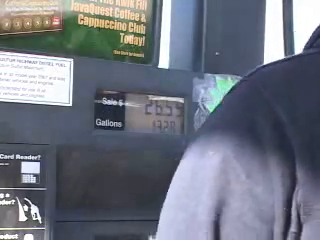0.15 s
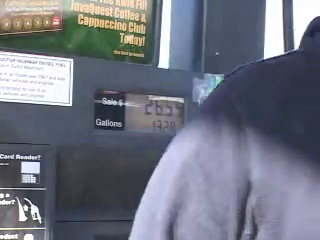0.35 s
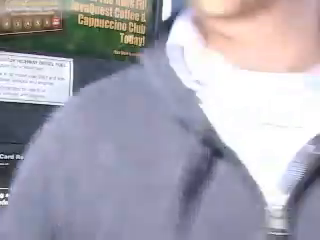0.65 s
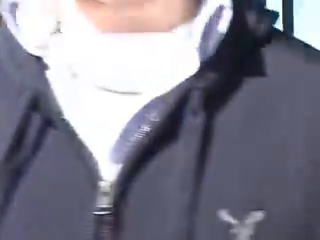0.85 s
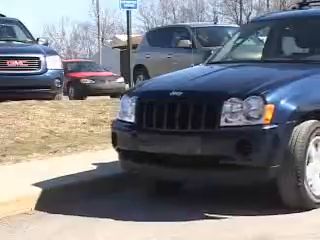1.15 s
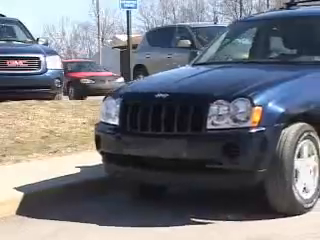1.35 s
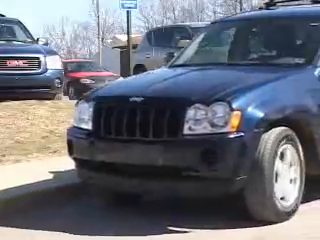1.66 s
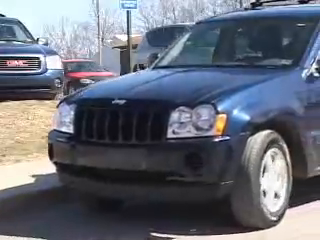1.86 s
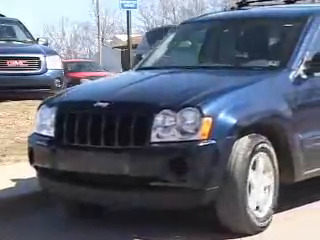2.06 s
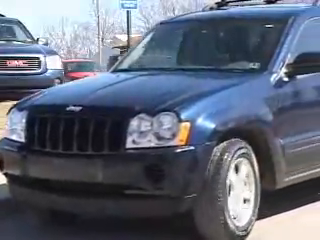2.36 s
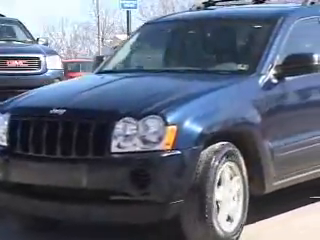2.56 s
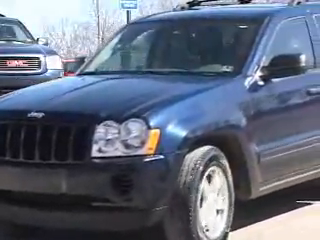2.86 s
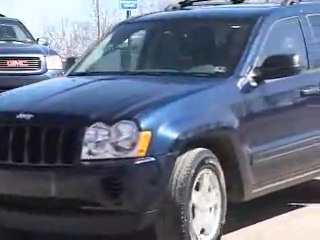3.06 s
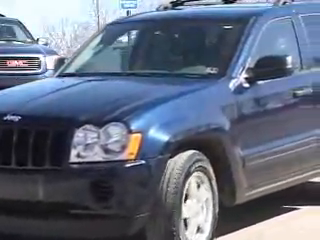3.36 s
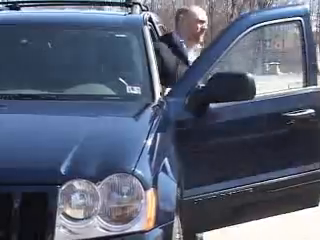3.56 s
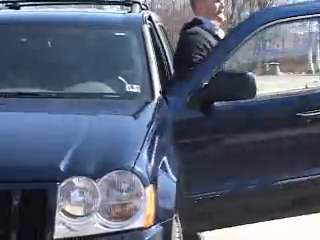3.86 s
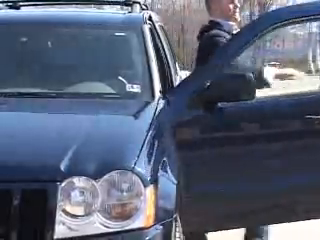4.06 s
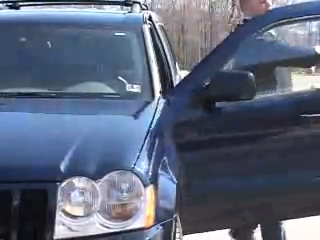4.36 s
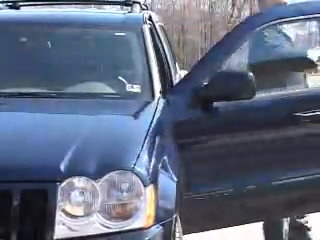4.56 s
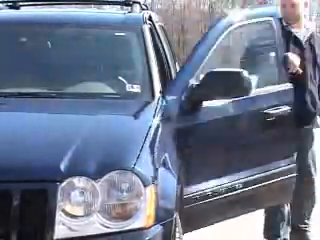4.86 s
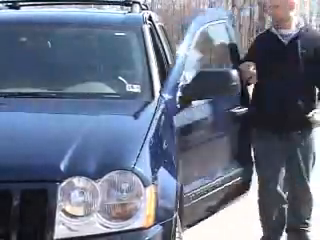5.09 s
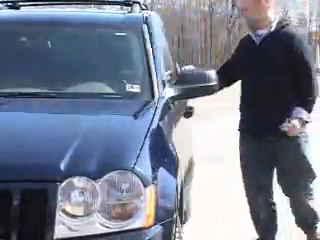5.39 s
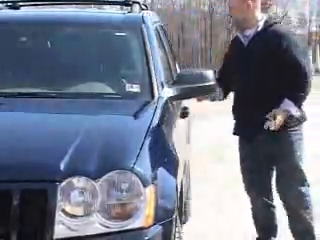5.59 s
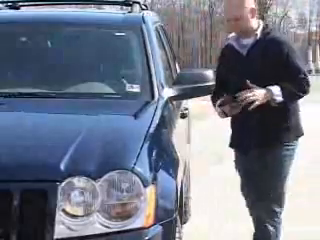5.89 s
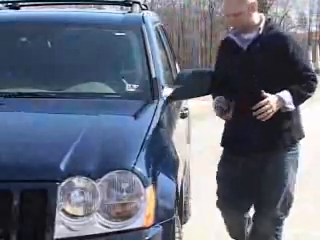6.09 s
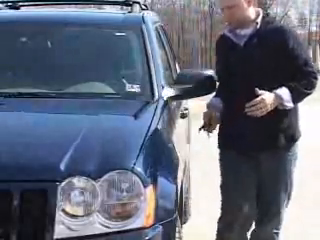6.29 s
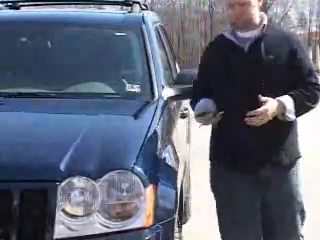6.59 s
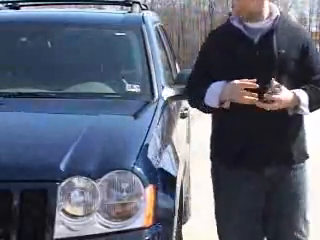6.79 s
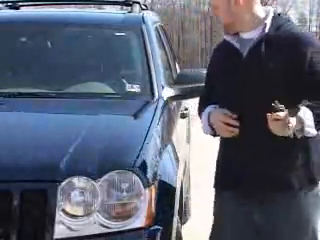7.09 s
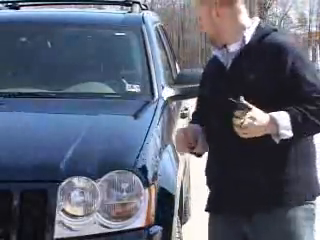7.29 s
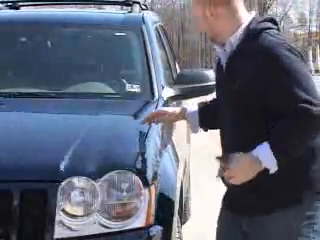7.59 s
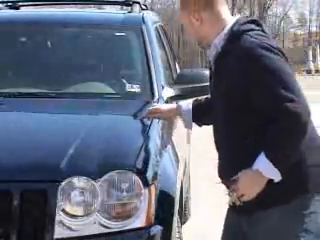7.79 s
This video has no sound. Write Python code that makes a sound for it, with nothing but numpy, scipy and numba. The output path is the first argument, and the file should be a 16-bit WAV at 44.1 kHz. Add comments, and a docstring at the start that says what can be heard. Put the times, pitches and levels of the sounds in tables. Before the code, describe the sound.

From 0 to 1.2 s a fuel pump drones with broad motor noise, the loudest background. At about 0.4 s the nozzle drops into its holster in a quick cluster of hollow knocks; a faint high spring squeak sags at 0.75 s, and the hose scrapes roughly at 1.0-1.2 s. A hard cut brings a quieter car, low engine murmur and tyres rolling slowly, with sparse grit ticks, notably at 1.6 s and dull taps near 2.3 s. At 3.6 s it cuts to still quieter open air. Soles scuff and grit snaps around 4.1-5.4 s; at 5.6 s the car door slams, a deep boomy thud with a brief latch rattle. Keys jingle brightly from 5.9 s, strongest at 6.05 and around 7 s, continuing to the end. Wind rumbles low on the microphone, mainly 5.8-7 s. Close footsteps crunch, with sharp loud grit cracks at 7.57 and 7.92 s.

```python
"""A fuel pump hums, then the nozzle thumps home, its spring squeaks and the hose scrapes. Hard cut: a car rolls
slowly up over gritty tarmac. Hard cut: its driver steps out, slams the door and walks off jangling keys while
wind rumbles on the microphone. Struck bodies are banks of decaying modes, grit and keys are random impulses
through resonances, and the pump, car, wind and open air are filtered noise."""
import sys
import numpy as np
from scipy import signal
from scipy.io import wavfile
from scipy.ndimage import uniform_filter1d
from numba import njit

SR = 44100
rng = np.random.default_rng(int(sys.argv[2]) if len(sys.argv) > 2 else 0)


def master_out(mix):
    """Clip the mix to full scale and print it as 16-bit PCM to the path in sys.argv[1]."""
    frames = np.transpose(np.atleast_2d(mix))
    ceiling = np.clip(frames, -1, 1)
    pcm = np.round(ceiling * 32767).astype(np.int16)
    wavfile.write(sys.argv[1], SR, pcm)


N = 350154
OPPOSED = np.array([[1], [-1]])  # left and right in opposite polarity


# Modes of the holster: mode_hz, relative_db, t60_s
NOZZLE_MODES = [(95.6, -15, 0.44), (137, -20, 0.55), (193, -1, 0.076), (252, 4.5, 0.045),
                (334, -3.5, 0.036), (389.7, -3, 0.15), (510, -3.5, 0.045), (840, -16, .06),
                (1050, -18, .06), (1320, -21, .04)]
# Knocks of the nozzle going home: start_s, blow_db
NOZZLE_BLOWS = [(.373, -33), (.383, -15), (.39, -16), (.397, -14), (.41, -24), (.438, -30.5), (.449, -27)]


def nozzle_thump():
    """The nozzle drops into its holster: a cluster of knocks rings the holster's modes."""
    return struck(NOZZLE_BLOWS, NOZZLE_MODES, contact_s=0.0018, shudder_db=-30.5, shudder_t60=0.17)


def spring_squeak():
    """A spring squeaks: a sagging sine with rough pitch and strength."""
    peak_s, rms_db, rise_s, t60_s = .762, -37, .04, .28
    peak_hz, sag_hz_per_s = 4980, 830
    t = np.arange(N) / SR
    hz = peak_hz - sag_hz_per_s * np.clip(t - peak_s, -.1, .1)
    wavering_hz = hz * (1 + 0.013 * walk(500))
    tone = np.sqrt(2) * np.sin(2 * np.pi * np.cumsum(wavering_hz) / SR)
    return burst(peak_s, rms_db, rise_s, t60_s) * undb(4.5 * walk(290)) * tone


# Pressure of the dragging hose: time_s, pressure_db
SCRAPE_PRESSURE = [(1.0, -56), (1.014, -30), (1.035, -28), (1.095, -38), (1.105, -46), (1.135, -38),
                   (1.215, -57)]
# Resonances the dragging hose excites: centre_hz, width_hz, relative_db
SCRAPE_RINGS = [(338, 99, -7), (523, 52, -0.5), (810, 83, -9), (834, 83, 4.5), (980, 150, 0.5),
                (1110, 190, -7), (4000, 230, -1.5), (5360, 3500, 7)]


def hose_scrape():
    """The hose drags in stick-slip: random slips excite resonances, deeper and duller as it goes."""
    gate, pressure_db = curve(SCRAPE_PRESSURE)
    since = np.clip(np.arange(N) / SR - SCRAPE_PRESSURE[0][0], 0, .17)
    deep_db = -10 + 96 * since  # dB/s, rings below 700 Hz
    bright_db = -9 - 134 * since  # dB/s, rings above 3 kHz
    slips = grains(900, 3.4)
    rings = 0
    for hz, width, db in SCRAPE_RINGS:
        ring_db = db + (hz < 700) * deep_db + (hz > 3000) * bright_db
        rings = rings + undb(ring_db) * unit(band(slips, hz, width))
    return gate * undb(pressure_db) * rings / 2


# Rattles of lock and trim: peak_s, level_db, rise_s, t60_s
LATCH_RATTLES = [(5.588, -24.5, 0.031, 0.081), (5.621, -35.5, 0.015, 0.26)]


def door_latch():
    """Lock and trim rattle: dense impulses through a broad mid band and a low band."""
    rattle = grains(3000, 2.0)
    metal = unit(svf(rattle, 2100.0, 2400.0))
    low = undb(7.5) * unit(band(rattle, 500, 970))
    return sum(burst(*row) for row in LATCH_RATTLES) * (metal + low)


# Modes of panel and cabin: mode_hz, relative_db, t60_s
DOOR_MODES = [(54.4, -5.5, 0.27), (79.2, -3, 0.27), (100, -3, 0.18), (134.5, -2, 0.078), (154, -3, 0.079),
              (205, -6.5, 0.11), (277, -8, .13), (338, -14, .12), (426, -11, .12), (710, -21, .1),
              (947, -22, .1), (1140, -21, .1)]
# Pushes of the panel on its frame: start_s, blow_db
DOOR_BLOWS = [(5.574, -27), (5.586, -18.5), (5.603, -21), (5.619, -13.5), (5.632, -27), (5.655, -26),
              (5.69, -25.5)]


def door_slam():
    """The panel meets its frame and the cabin booms in low modes; the deepest boom leans left."""
    boom = struck(DOOR_BLOWS, DOOR_MODES, contact_s=0.0048, shudder_db=-36.5, shudder_t60=0.29)
    return boom + 0.41 * band(boom, 45, 43) * OPPOSED


# Modes of the keys: mode_hz, relative_db
KEY_MODES = [(3690, -8), (4005, -9.5), (4640, -6), (5040, -1), (5430, -23), (5780, -6), (6630, 0),
             (7190, 5.5), (7480, 0.5), (7900, -17), (8200, 1.5), (8530, 7), (8800, -7), (9300, -2),
             (9770, -9), (10250, 1), (10570, -28), (11070, 9.5), (11230, -2), (11500, 1), (11900, -2.5)]
# Swings and jolts of the bunch: peak_s, effort_db, rise_s, t60_s
KEY_SHAKES = [(3.84, -69, 0.18, 0.79), (4.13, -61, 0.036, 0.23), (5.94, -46, 0.11, 0.47),
              (6.06, -30.5, 0.061, 0.22), (6.091, -34, 0.04, 0.12), (6.28, -60, 0.027, 0.32),
              (6.56, -62, 0.031, 0.12), (6.78, -59.5, 0.045, .15), (6.844, -43, 0.016, 1.1),
              (6.925, -36.5, 0.02, 0.97), (7.0, -37.5, 0.05, 1.03), (7.13, -43, 0.12, 0.18),
              (7.29, -41.5, 0.16, 1), (7.455, -40.5, .04, 0.17), (7.748, -34.5, 0.027, 0.55),
              (7.86, -46, 0.044, 0.18)]
# Hard strikes of key on key: strike_s, relative_db
KEY_CLINKS = [(5.8487, -33.5), (5.922, -28), (5.9329, -26), (6.0536, -13), (6.3118, -34.5), (6.355, -44),
              (6.387, -45.5), (6.562, -31.5), (6.702, -34.5), (6.9193, -23.5), (6.992, -18), (7.1302, -26),
              (7.433, -19.5), (7.4644, -18.5), (7.7448, -30), (7.7925, -27), (7.8346, -31)]


def keys():
    """Shaken keys touch at random; every touch rings another mix of modes, damped by the hand."""
    effort = sum(burst(*jolt) for jolt in KEY_SHAKES) * undb(3.8 * walk(90))
    t = np.arange(3000) / SR
    clink = np.minimum(t / 0.00066, 1) * undb(-60 * t / 0.029)
    for s, db in KEY_CLINKS:
        add(effort, s - .002, undb(db - 7.5) * clink)
    touches = effort * unit(grains(1300, 2.2))
    chatter = band(touches * rng.standard_normal(N), 7470, 11000)
    out = undb(-0.5) * chatter * np.ones((2, 1))
    for hz, db in KEY_MODES:
        for detune in 1, 1 + 0.0197 * rng.standard_normal():  # a similar key rings close by
            favoured = undb(9 * walk(40))
            push = touches * favoured * rng.standard_normal(N)
            out += pan(ring(push, hz * detune, db - 41.0, t60=.04), 0.84 * rng.standard_normal())
    return out


SCATTER_DB = 0.5  # random left-right difference of grains and crunches

# Rubs and crunches of soles, tyres and fittings: peak_s, body_db, brightness_db, t60_s
CRUNCHES = [(0.39, -31.5, -17, 0.18), (.446, -46, 8, 0.19), (.64, -45.5, 2, 0.18), (1.623, -42, -3, .084),
            (2.752, -57, 8.5, .12), (4.123, -57.5, -10, 0.33), (4.288, -58.5, -1, 0.61),
            (4.353, -51.5, 13, 0.057), (4.702, -44.5, 3.5, 0.15), (4.763, -51, 0, 0.33),
            (4.851, -44.5, -8.5, 0.21), (5.245, -48.5, -1.5, 0.25), (5.41, -65.5, 14.5, .5),
            (5.949, -57, 10.5, 0.45), (6.044, -46, 5.5, 0.32), (6.505, -48, -6, 0.31),
            (6.607, -52.5, -8, 0.24), (6.945, -52.5, 15, 0.56), (7.0, -38, -4, .4),
            (7.083, -46.5, -11.5, 0.12), (7.35, -35, -10.5, 0.11), (7.58, -23, -2.5, 0.099),
            (7.64, -49.5, 2, 0.53), (7.921, -25.5, -3, 0.3)]


def crunch():
    """Soles, tyres and fittings rub: dense grains in three bands, the low one weaker when brighter."""
    sand = grains(1800, 3.5)
    body = unit(band(sand, 2620, 1870))
    bright = unit(band(sand, 4380, 4100))
    low = unit(band(sand, 596, 1090))
    out = np.zeros((2, N))
    for s, db, bright_db, t60 in CRUNCHES:
        mix = body + undb(bright_db) * bright + undb(-7.5 - 0.92 * bright_db) * low
        out += pan(burst(s, db, 0.034, t60) * mix, SCATTER_DB * rng.standard_normal())
    return out


# Single snapping grains: start_s, peak_db, centre_hz
GRIT_SNAPS = [(.7093, -26.5, 4940), (1.3289, -35, 2310), (1.6214, -22, 3300), (2.1015, -39, 2310),
              (2.5156, -35.5, 2550), (2.765, -35.5, 2280), (3.081, -32, 3185), (4.117, -35.5, 2430),
              (4.139, -29.5, 1670), (4.2842, -37, 4970), (4.354, -17, 6140), (4.6924, -16.5, 4900),
              (4.6985, -18, 3750), (4.7, -18.5, 4100), (4.705, -17.5, 3000), (4.7603, -32, 1920),
              (4.7634, -21.5, 3550), (4.7802, -29.5, 2210), (4.8491, -20, 2130), (4.8567, -22, 2040),
              (4.8677, -32, 2700), (4.926, -43, 2200), (5.2404, -32, 4930), (5.2467, -33, 2920),
              (5.276, -26.5, 4570), (5.3597, -36, 4600), (5.4046, -28, 4080), (5.429, -35, 3950),
              (5.469, -35, 4700), (5.8788, -25.5, 4340), (5.8977, -37, 5820), (6.0044, -26, 4800),
              (6.4966, -27, 2950), (6.5055, -26.5, 5000), (6.517, -33, 2920), (6.6368, -32, 2850),
              (7.082, -19.5, 2540), (7.3486, -16.5, 2160), (7.5628, -21, 2030), (7.5742, -6.5, 2780),
              (7.5819, -9, 2420), (7.5934, -11, 2590), (7.6565, -22.5, 2880), (7.749, -25, 2940),
              (7.9117, -19, 2430), (7.9217, -10, 3740), (7.9344, -14, 3200)]


def grit():
    """Lone grains snap: a click and a noise flash with a short tail from the tarmac, through one band."""
    out, t = np.zeros((2, N)), np.arange(3000) / SR
    decay = np.exp(-t / 0.00017) + 0.12 * np.exp(-t / 0.0056)
    for s, db, hz in GRIT_SNAPS:
        click = (t == 0) * 1.5
        snap = band(click + rng.standard_normal(3000) * decay, hz, 1.07 * hz)
        add(out, s, pan(undb(db) * snap / abs(snap).max(), SCATTER_DB * rng.standard_normal()))
    return out


# Dull falls of heel and toe: start_s, peak_db, centre_hz
HEEL_FALLS = [(2.27, -30.5, 1360), (2.278, -43.5, 567), (4.149, -43.5, 566), (4.853, -33.5, 780),
              (6.51, -44, 595), (6.54, -41, 600), (6.571, -37, 540), (6.998, -29.5, 457), (7.028, -31, 720),
              (7.081, -29, 765), (7.348, -23.5, 726), (7.56, -26.5, 1590), (7.908, -33, 630)]


def footfalls():
    """Heel and toe fall dully: short decaying noise in a narrow band."""
    out, t = np.zeros(N), np.arange(3000) / SR
    envelope = undb(-60 * t / 0.056) * np.minimum(t / 0.0039, 1)
    for s, db, hz in HEEL_FALLS:
        thud = band(rng.standard_normal(3000) * envelope, hz, 0.5 * hz)
        add(out, s, undb(db) * thud / abs(thud).max())
    return out


def surroundings(near):
    """Car flank, pump and tarmac send back a short scatter, different at each side."""
    t = np.arange(4000) / SR
    tail = rng.standard_normal((2, 4000)) * undb(-60 * t / 0.071) * (t > .001)
    tail = signal.sosfilt(signal.butter(2, 400, "high", fs=SR, output="sos"), tail)
    return near + undb(-40.5) * signal.fftconvolve(near, tail, axes=1)[:, :N]


# Strength of the wind: time_s, strength_db
WIND_STRENGTH = [(3.59, -55.5), (3.9, -56), (3.95, -48), (4.22, -63.5), (4.3, -53), (4.4, -61.5),
                 (5.0, -88), (5.07, -67), (5.5, -65), (5.83, -51), (6.38, -48.5), (6.43, -44), (6.49, -52),
                 (6.69, -44.5), (6.9, -56), (6.98, -49), (7.17, -60.5), (7.94, -72)]


def wind():
    """Gusts push low noise on the two ports mostly in opposition, harder on the left."""
    gate, db = curve(WIND_STRENGTH)
    mid, side = (unit(band(rng.standard_normal(N), 46.2, 37.3)) * undb(4.8 * walk(12)) for _ in range(2))
    return pan(gate * undb(db) * (mid + 1.63 * side * OPPOSED), 1.4)


# Resonances of the pump housing: centre_hz, width_hz, level_db
PUMP_RINGS = [(388, 45, -50.5), (846, 65, -53.5), (1050, 43, -50.5)]


def pump():
    """The pump's machine noise sounds through the resonances of its housing."""
    return hum(PUMP_RINGS)


# Resonances of the engine bay: centre_hz, width_hz, relative_db
CAR_RINGS = [(116, 29, -63), (211, 31, -66), (566, 67, -70.5), (814, 62, -69.5), (1074, 36, -73),
             (1380, 120, -72.5), (2330, 150, -77), (4900, 640, -69)]


def car(swell_db):
    """The car's machine noise sounds through its engine bay and swells with the given level."""
    return hum(CAR_RINGS) * undb(swell_db)


# Moments of the two hard cuts between places: cut_s
CUTS_S = 1.217, 3.588
# Steady sound, one row a place: colour (hz, relative_db_per_hz), mid_db, left-right likeness (hz, -1..1)
PLACES = [([(15, -43), (25, -12), (85, 5.5), (158, -9), (200, -3.5), (383, -5), (566, -6), (1030, -7.5),
          (1820, -12.5), (5030, -16.5), (9640, -26.5), (11000, -22.5), (12500, -89), (16200, -113),
          (22000, -120)], -43.5, [(60, 0.73), (250, 1), (1200, 0.3), (2700, 0.65), (6000, 0.83)]),
          ([(15, -48), (25, -4.5), (129, 2), (364, -14.5), (815, -18.5), (928, -11), (1030, -18),
          (1780, -29), (3410, -30.5), (4900, -33.5), (8690, -34.5), (11600, -57), (12500, -59),
          (16200, -99), (22000, -120)], -51.5, [(60, 0.32), (150, 0.74), (900, 0.14), (2700, 1),
          (6000, 1)]), ([(15, -31), (25, -13.5), (85, -3.5), (125, -1.5), (337, -17), (472, -17),
          (628, -19), (794, -20.5), (1140, -20), (1340, -25), (1820, -35), (11300, -46), (12500, -66),
          (16200, -105), (22000, -120)], -60, [(60, .1), (250, 1), (1200, 0.34), (2700, 1), (6000, 0.99)])]
# Swell of the steady sound, one list a place: time_s, tilt_db (half lifts lows, half lowers highs), treble_db
SWELL = [
    [(0, -1.5, 0.6), (.6, 7, 4.5), (.78, 4.5, 7), (.95, 1, -0.5), (1.1, 5, 2.5), (1.21, 13, -1)],
    [(1.23, -6.5, 2.5), (2.2, 2, 7), (2.6, -5, 8.5), (3.1, -10.5, 5), (3.58, -13, 0)],
    [(3.6, -3, 6.5), (4.4, 3.5, 7.5), (5.5, -2, 12.5), (7.94, 6, 18)],
]


def outdoors():
    """Motors, tyres and far traffic as third-octave noise, with a colour and width per place, plus pump and car."""
    place = np.searchsorted(CUTS_S, np.arange(N) / SR)
    _, tilt_db, treble_db = curve(np.vstack(SWELL))
    centres = 25 * 2 ** np.arange(0, 9.1, 1 / 3)

    def read(table):
        hz, values = np.array(table).T
        return np.interp(np.log(centres), np.log(hz), values)

    gain = []
    for colour, mid_db, _ in PLACES:
        shape = unit(undb(read(colour)) * np.sqrt(centres))  # wider bands hold more noise
        gain.append(undb(mid_db) * shape / np.sqrt(len(centres)))
    gain = np.array(gain)
    alike = np.clip([read(likeness) for *_, likeness in PLACES], -.99, .99)
    out = 0
    for k, hz in enumerate(centres):
        mid, side = (unit(band(rng.standard_normal(N), hz, hz * 0.36)) for _ in range(2))
        share = np.clip(np.log2(hz / 250) / 3, 0, 1)  # treble share: 0 to 250 Hz, 1 from 2 kHz
        swell_db = (0.5 - share) * tilt_db + share * treble_db
        level = gain[place, k] * undb(swell_db + 2.3 * walk(9))
        wide = np.sqrt((1 - alike[:, k]) / (1 + alike[:, k]))[place]
        out = out + level * (mid + wide * side * OPPOSED)
    return out + car(treble_db) * (place == 1) + pump() * (place == 0)


def hum(rings):
    """Machine noise heard through resonances that waver in strength."""
    out = 0
    for hz, width, db in rings:
        tone = unit(svf(rng.standard_normal(N), 1. * hz, 1. * width))
        out = out + undb(db + 3.1 * walk(12)) * tone
    return out


def struck(blows, modes, contact_s, shudder_db, shudder_t60):
    """Brief smooth pushes into a body, each with a shudder of loose parts; each blow weights the modes anew."""
    out, t = np.zeros(N), np.arange(SR) / SR
    contact = np.hanning(int(contact_s * SR) + 3)
    for s, db in blows:
        weights = undb(3.9 * rng.standard_normal(len(modes)))
        push = rng.standard_normal(SR) * undb(shudder_db - 60 * t / shudder_t60)
        push[0] += 1
        push = np.convolve(push, contact / contact.sum())[:SR]
        add(out, s, undb(db) * sum(w * ring(push, *mode) for w, mode in zip(weights, modes)))
    return out


def ring(x, hz, db, t60):
    """One mode; a unit impulse starts it at the given level."""
    width = np.log(1000) / np.pi / t60
    return svf(x, 1. * min(hz, .45 * SR), width) * undb(db) * SR / (2 * np.pi * width)


def band(x, hz, width):
    """Steep band: the same resonance twice."""
    return svf(svf(x, 1. * hz, 1. * width), 1. * hz, 1. * width)


@njit
def svf(x, hz, width):
    """State-variable band-pass, gain 1 at the centre."""
    y, b, l = np.empty(len(x)), 0., 0.  # b, l: band and low states
    g, k = np.tan(np.pi * hz / SR), width / hz
    for i in range(len(x)):
        v = (b + g * (x[i] + 1e-18 - l)) / (1 + g * (g + k))
        b, l, y[i] = 2 * v - b, l + 2 * g * v, k * v
    return y


def grains(rate, spread_db):
    """Random impulses, rate a second, a few of them much larger than the rest."""
    hits = rng.random(N) < rate / SR
    size_db = spread_db * np.minimum(rng.exponential(size=N), 3.5)
    return hits * rng.choice([-1, 1], N) * undb(size_db)


def walk(rate):
    """Random levels held 1 / rate s and smoothed by two moving averages."""
    k = int(SR / rate)
    steps = np.repeat(rng.standard_normal(N // k + 1), k)
    return uniform_filter1d(uniform_filter1d(steps, k), k)[:N]


def burst(peak_s, db, rise_s, t60):
    """Envelope: a curved rise to the peak, then an exponential fall."""
    t = np.arange(N) / SR - peak_s
    return np.clip(1 + t / rise_s, 0, 1) ** 2 * undb(db - 60 * np.maximum(t, 0) / t60)


def curve(rows):
    """A gate that opens over a table's span with soft edges, then the table's columns as signals."""
    s, *columns = np.transpose(rows)
    t = np.arange(N) / SR
    gate = uniform_filter1d(1. * ((t > s[0]) & (t < s[-1])), size=300)
    return gate, *(np.interp(t, s, c) for c in columns)


def undb(db):
    """Decibels to amplitude."""
    return 10 ** (np.asarray(db) / 20)


def unit(x):
    """Scale to an RMS of 1."""
    return x / np.sqrt(np.mean(x ** 2))


def pan(x, db):
    """Make left louder than right by db."""
    return x * undb(np.array([db, -db]).reshape(2, -1) / 2)


def add(out, s, x):
    """Mix x into out from s seconds on."""
    i = int(s * SR)
    out[..., i:i + x.shape[-1]] += x[..., :N - i]


def scene():
    """Near sounds with their scatter over the steady outdoors and the wind; the keys keep the most treble."""
    dull = signal.cheby1(10, 1, 9050, fs=SR, output="sos")
    nozzle = nozzle_thump() + spring_squeak() + hose_scrape()
    door = door_latch() + door_slam()
    ground = crunch() + grit() + footfalls()
    near = surroundings(signal.sosfilt(dull, nozzle + door + ground) + keys())
    far = signal.sosfilt(signal.butter(10, 9800, fs=SR, output="sos"), outdoors())
    return near + far + wind()


def record(dry):
    """A steep low-pass ends the treble at 12.1 kHz."""
    return signal.sosfilt(signal.ellip(10, .2, 80, 12100, fs=SR, output="sos"), dry)


dry = scene()
out = record(dry)
master_out(out)
```